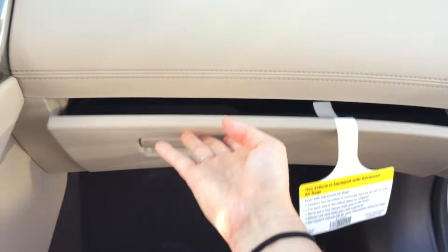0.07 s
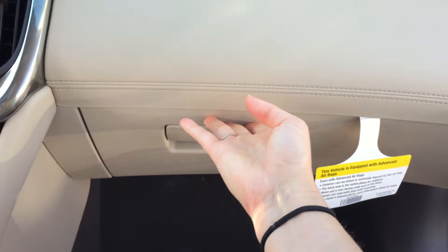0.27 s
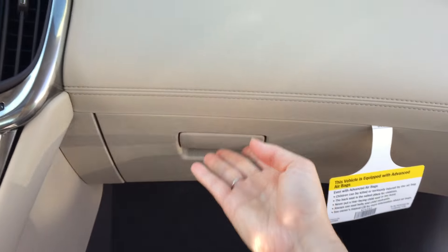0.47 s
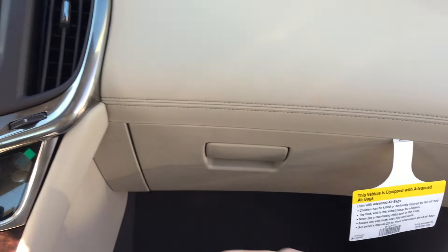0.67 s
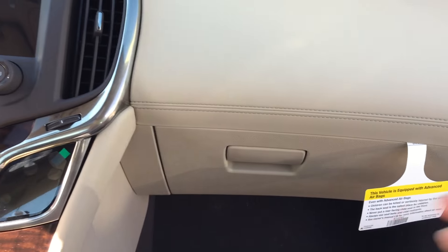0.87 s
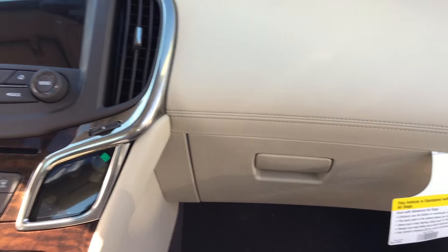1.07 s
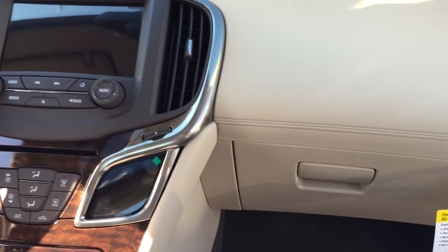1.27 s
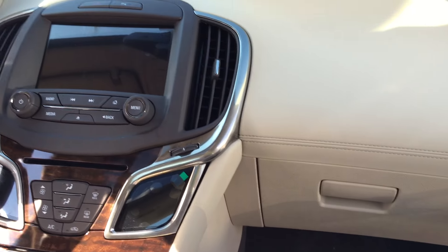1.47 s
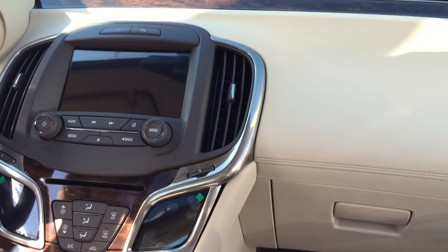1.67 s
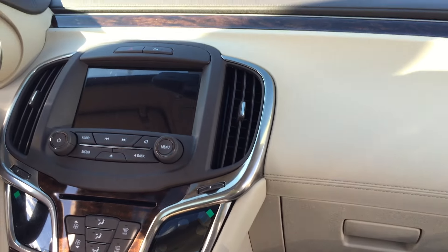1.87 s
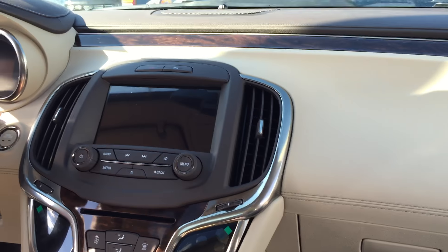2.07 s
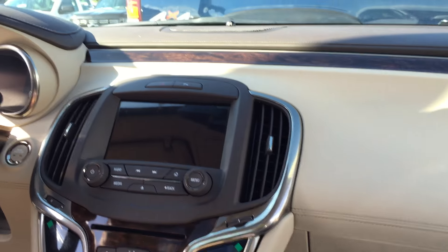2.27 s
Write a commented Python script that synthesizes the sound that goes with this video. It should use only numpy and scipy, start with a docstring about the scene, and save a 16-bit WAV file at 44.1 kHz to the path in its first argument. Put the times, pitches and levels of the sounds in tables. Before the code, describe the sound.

Close to the dashboard of a parked car, a plastic glovebox closes with a quick double clack and a dull thump. The small, padded cabin keeps humming low, with faint hiss and soft handling rustles near the end.

```python
"""Closing a glovebox in a parked car

A plastic lid slides up on its hinge with a rub of friction and meets its rubber stops with a thump.
The latch clicks over the striker and snaps home; each impact excites the damped modes of the plastic,
and the lid's weight shakes the dashboard. A low hum and a faint hiss of air fill the small, padded
cabin, with soft rustles of handling, mostly near the end."""
import sys
import numpy as np
from scipy import signal
from scipy.fft import rfft, irfft, next_fast_len
from scipy.io import wavfile
from scipy.ndimage import uniform_filter1d

SR = 44100
rng = np.random.default_rng(int(sys.argv[2]) if len(sys.argv) > 2 else 0)


def persist_wave(psi):
    """Save psi, clipped to +-1, as 16-bit WAV."""
    counts = np.round(np.clip(psi, -1, 1) * 32767).astype(np.int16)
    wavfile.write(sys.argv[1], SR, np.atleast_2d(counts).T)


N = 101429
TIME = np.arange(N) / SR

# hard contacts of lid and latch: (time [s], level [dB], treble tilt [dB/octave], modal gain [dB],
# crack frequency [Hz], crack gain [dB])
CONTACTS = [(0.21, -8, -1, -9, 2382, -9.5), (0.215, -13, -5.5, -8, 1864, -2.5),
            (0.2231, -16.5, -1, -8.5, 1820, -21), (0.2261, -17, 1, -3.5, 2280, -8.5),
            (0.2902, -20, -2, -1.5, 2240, -6.5), (0.2936, -18.5, -0.5, -2.5, 2440, -4),
            (0.2957, -22.5, -6, 3.5, 1475, 6.5), (0.304, -22, -1, -5, 2098, -7.5),
            (0.3124, -5.5, 3, 6.5, 2373, -1), (0.317, -3, 1, -10.5, 1700, -8.5),
            (0.3188, -14, -8, -9.5, 780, -2.5), (0.333, -37, 5, -9, 2300, -8),
            (0.3445, -38, 3, -5, 1976, -9.5)]
PIVOT_HZ = 1390  # spectral tilts turn about this frequency


def cracks():
    """Impulse response: the small part struck at each contact rings briefly at its own frequency."""
    return sum(damped_mode(impulses(np.array([time]), db + crack_db), hz, t60=.019)
               for time, db, _, _, hz, crack_db in CONTACTS)


def clack():
    """Statistical decay: the plastic's dense modes and the cabin's echoes die away as bands of noise."""
    # spectrum of the dense modes: (frequency [Hz], relative density [dB])
    spectrum = [(200, -22.5), (500, -2), (900, -10), (1500, 2.5), (2400, 1), (3300, -6.5), (5500, -17),
                (7200, -20), (9500, -21), (12500, -25.5), (15500, -38.5)]
    times, db, tilt = np.transpose(CONTACTS)[:3]
    edges = np.geomspace(180, 16000, 20)
    centres = np.sqrt(edges[1:] * edges[:-1])
    shares = from_db(spectrum_at(spectrum, centres)) * np.sqrt(np.diff(edges))
    out = 0
    for low, high, hz, share in zip(edges, edges[1:], centres, shares / np.linalg.norm(shares)):
        octaves = np.log2(hz / PIVOT_HZ)
        force = impulses(times, db + tilt * octaves)
        plastic = power_decay(force * from_db(-11), t60=.024)
        cabin = power_decay(force * from_db(-24.5), t60=.09 * (PIVOT_HZ / hz) ** .22)
        # a faint late ring between the windows, rising 1 dB per octave
        windows = power_decay(force * from_db(-57.5 + octaves), t60=.54)
        burst = np.sqrt(plastic + cabin + windows) * rng.standard_normal(N)
        band = signal.butter(2, [low, high], "band", fs=SR, output="sos")
        out = out + share * np.sqrt(SR / 2 / (high - low)) * signal.sosfilt(band, burst)
    return out


def lid_ring():
    """Modal superposition: every contact excites all the lid's modes, neighbours in opposite phase."""
    # modes of the plastic lid and latch: (frequency [Hz], relative level [dB], T60 [s])
    modes = [(425, -14, .07), (560, -11, .075), (772, -4, .065), (856, -8, .055), (943, -11, .07),
             (1207, -9, .06), (1455, -4.5, .058), (1515, -4, .05), (1737, -5, .053), (2066, -2, .048),
             (2293, -3.5, .037), (2480, -1.5, .045), (2812, -7.5, .05), (3091, -17, .05), (4007, -19, .042),
             (5635, -14, .034), (8735, -22, .028), (9700, -25, .026)]
    times, db, tilt, modal_db = np.transpose(CONTACTS)[:4]
    out = 0
    for k, (hz, mode_db, t60) in enumerate(modes):
        scatter_db = 1.5 * rng.standard_normal(len(times))
        strike_db = db + modal_db + mode_db + tilt * np.log2(hz / PIVOT_HZ) + scatter_db
        out = out + (-1) ** k * damped_mode(impulses(times, strike_db), hz, t60)
    return from_db(-15) * out


def thumps():
    """Selective excitation: a soft impact drives most the box modes nearest its centre frequency."""
    # the lid's weight lands on the dashboard and settles: (time [s], level [dB], centre [Hz])
    landings = [(0.2160, -20, 145), (0.2229, -19, 140), (0.2364, -24.5, 165), (0.2430, -29, 150),
                (0.3103, -22.5, 115), (0.3190, -16.5, 122), (0.3405, -24, 95), (0.3532, -26, 78)]
    # modes of the box and dashboard: (frequency [Hz], relative level [dB], T60 [s])
    modes = [(82, 1, .18), (114, 0, .09), (149, 1, .115), (210, 0, .1), (240, -8, .11), (322, -3, .09),
             (368, -4, .085)]
    falloff_db_per_octave = 11
    times, db, centre_hz = np.transpose(landings)
    out = 0
    for hz, mode_db, t60 in modes:
        detuning_db = falloff_db_per_octave * np.abs(np.log2(hz / centre_hz))
        scatter_db = rng.standard_normal(len(times))
        out = out + damped_mode(impulses(times, db + mode_db - detuning_db + scatter_db), hz, t60)
    return out


def rubbing():
    """Sliding friction: the hinge rubs and sings in a gliding resonance, then the latch scrapes."""
    # friction at the hinge and at the striker: (time [s], level [dB])
    hinge_level = [(0, -60), (.045, -53.5), (.08, -55.5), (.12, -61.5), (.19, -57.5), (.215, -49.5),
                   (.25, -109)]
    latch_level = [(.22, -69.5), (.24, -43.5), (.283, -43), (.297, -25.5), (.311, -21), (.325, -56.5)]
    # their spectra: (frequency [Hz], relative density [dB])
    hinge_spectrum = [(250, 14), (500, -11.5), (950, -9), (1400, 1.5), (1750, -2.5), (2500, -5),
                      (3100, -15), (3700, -9.5), (5500, -28.5), (14000, -37.5)]
    latch_spectrum = [(210, 16), (330, -1), (600, -4), (900, 4), (1250, -2), (1470, -2.5), (1700, -3),
                      (2400, -3.5), (3400, -18), (7000, -31), (15000, -41.5)]
    # resonance of the hinge: (time [s], frequency [Hz])
    hinge_glide = [(0, 1428), (.06, 1382), (.14, 1230), (.2, 1450)]
    grip = roughness()
    phase = 2 * np.pi * np.cumsum(np.interp(TIME, *np.transpose(hinge_glide))) / SR
    singing = unit_rms(drift(corner_hz=130) * np.cos(phase) + drift(corner_hz=130) * np.sin(phase))
    hinge = envelope(hinge_level) * (coloured(hinge_spectrum) + from_db(-1) * singing)
    latch = envelope(latch_level) * coloured(latch_spectrum)
    return grip * (hinge + latch)


def cabin_hum():
    """Cavity resonance: noise in the cabin's low modes makes a wavering hum over a broad rumble."""
    # level of the low hum, which wavers and dips briefly after the knock:
    # (time [s], deep level [dB], upper level [dB])
    hum_level = [(0, -36.5, -36.5), (.15, -38.5, -38), (.3, -39.5, -34.5), (.41, -43, -40.5),
                 (0.469, -54, -48.5), (.56, -42.5, -41), (0.682, -39.5, -44), (.76, -36.5, -36),
                 (0.911, -47, -39.5), (1.001, -36, -39.5), (1.16, -42, -32.5), (1.309, -31, -35.5),
                 (1.42, -38, -33), (1.511, -49, -35), (1.62, -37.5, -34.5), (1.828, -43.5, -35.5),
                 (1.959, -34, -35), (2.07, -42.5, -37), (2.2, -34, -37.5), (2.3, -50.5, -36)]
    # upper cabin modes: (frequency [Hz], bandwidth [Hz], relative level [dB])
    modes = [(93.75, 11, 4.5), (117.96, 19, -1), (141, 30, -9)]
    # spectrum of the rumble: (frequency [Hz], relative density [dB])
    rumble_spectrum = [(25, -30.5), (45, -10), (100, 9), (170, -0.5), (230, -12), (310, -13), (400, -26.5)]
    deep_gain, upper_gain = (envelope(np.array(hum_level)[:, [0, k]]) for k in (1, 2))
    deep = steadied(resonant_noise(hz=57.93, width_hz=8.4))
    upper = steadied(sum(from_db(db) * resonant_noise(hz, width) for hz, width, db in modes))
    rumble_gain = from_db(-43.5) * unit_rms(upper_gain) ** .4  # partly follows the upper hum
    return deep_gain * deep + upper_gain * upper + rumble_gain * coloured(rumble_spectrum)


def air():
    """Broadband and narrowband noise: air hisses evenly while a faint whirr comes and goes."""
    # strength of the hiss and of the whirr: (time [s], level [dB])
    hiss_level = [(0, -59), (.5, -59), (.8, -58.5), (1.05, -58), (1.42, -59), (1.85, -59), (2.3, -58)]
    whirr_level = [(0, -82.5), (.6, -79), (.68, -68.5), (.85, -81.5), (1.08, -75.5), (1.22, -64.5),
                   (1.34, -84.5), (1.48, -80), (1.59, -64), (1.72, -73.5), (1.88, -67), (2.0, -74),
                   (2.11, -66), (2.3, -94.5)]
    # spectrum of the hiss: (frequency [Hz], relative density [dB])
    hiss_spectrum = [(200, 16), (400, -6), (600, -2), (780, -4.5), (1020, -4.5), (1300, -6.5), (2300, -12),
                     (4500, -19), (9000, -23), (15000, -28.5)]
    hiss = envelope(hiss_level) * coloured(hiss_spectrum)
    whirr = envelope(whirr_level) * band_noise(hz=1040, octaves=.11)
    return hiss + whirr


def rustles():
    """Amplitude modulation: each handling sound is a grainy noise band under a Gaussian envelope."""
    # soft bumps, rustles and squeaks:
    # (time [s], standard deviation [s], level [dB], centre [Hz], half-width [octaves])
    touches = [(.478, 0.0047, -60, 1830, 0.39), (0.727, 0.011, -57, 198, 0.33),
               (0.793, 0.035, -66, 540, 0.14), (0.943, 0.15, -73, 2550, 0.32),
               (1.517, 0.029, -54.5, 230, 0.28), (1.835, 0.064, -66.5, 618, 0.21),
               (1.959, 0.051, -57, 266, 0.36), (2.063, 0.038, -75, 13000, .2),
               (2.07, 0.049, -77, 8140, 0.22), (2.129, 0.015, -69, 1910, 0.034),
               (2.16, 0.0053, -66, 3955, .04), (2.163, 0.051, -69.5, 2840, 0.41)]
    grain = roughness()
    out = 0
    for time, sigma, db, hz, octaves in touches:
        gain = from_db(db) * np.exp(-.5 * ((TIME - time) / sigma) ** 2)
        out = out + gain * band_noise(hz, octaves)
    return grain * out


def damped_mode(force, hz, t60):
    """Damped oscillator: a unit impulse starts a unit sine that falls 60 dB in t60 seconds."""
    radius = from_db(-60 / (t60 * SR))
    angle = 2 * np.pi * hz / SR
    return signal.lfilter([0, np.sin(angle)], [1, -2 * radius * np.cos(angle), radius ** 2], force)


def power_decay(force, t60):
    """Exponential energy loss: power jumps at each blow and falls 60 dB in t60 seconds."""
    return signal.lfilter([1], [1, -from_db(-120 / (t60 * SR))], force ** 2)


def impulses(times, db):
    """Ideal impacts: one impulse of force for each blow."""
    force = np.zeros(N) + 1e-18
    np.add.at(force, (times * SR).astype(int), from_db(db))
    return force


def noise(spectrum_db):
    """Spectral shaping: noise of unit rms whose density in dB is a function of frequency."""
    size = next_fast_len(N)
    white = rfft(rng.standard_normal(size))
    gain = from_db(spectrum_db(np.fft.rfftfreq(size, 1 / SR)))
    return unit_rms(irfft(white * gain, size)[:N])


def coloured(spectrum):
    """Stationary noise with a tabulated spectrum."""
    return noise(lambda hz: spectrum_at(spectrum, hz))


def band_noise(hz, octaves):
    """Band-pass noise, at half power the given octaves either side of its centre."""
    return noise(lambda f: -10 * np.log10(1 + (np.log2((f + 1) / hz) / octaves) ** 4))


def resonant_noise(hz, width_hz):
    """Lorentzian response of one randomly driven resonance."""
    return noise(lambda f: -20 * np.log10(1 + (2 * (f - hz) / width_hz) ** 2))


def drift(corner_hz):
    """Low-pass random fluctuation of unit rms."""
    return noise(lambda hz: -20 * np.log10(1 + (hz / corner_hz) ** 2))


def roughness():
    """Random modulation: a gain that flickers by about half a decibel."""
    return unit_rms(from_db(.5 * drift(corner_hz=120)))


def steadied(x, window_s=.09):
    """Division by the running rms evens the slow level and leaves the fast beating."""
    return x / np.sqrt(uniform_filter1d(x ** 2, int(window_s * SR)) + 1e-12)


def envelope(curve):
    """Gain along a (time [s], level [dB]) curve, silent from 50 ms after its end."""
    times, db = np.transpose(curve)
    return from_db(np.interp(TIME, times, db)) * (TIME < times[-1] + .05)


def spectrum_at(spectrum, hz):
    """Log-frequency interpolation, falling 24 dB per octave beyond the table's ends."""
    known_hz, db = np.transpose(spectrum)
    octave, known = np.log2(hz + 1), np.log2(known_hz)
    beyond = np.abs(octave - np.clip(octave, known[0], known[-1]))
    return np.interp(octave, known, db) - 24 * beyond


def from_db(db):
    """Decibels to amplitude ratio."""
    return 10 ** (np.asarray(db) / 20)


def unit_rms(x):
    """Normalisation to unit power."""
    return x / np.sqrt(np.mean(x ** 2) + 1e-20)


def scene():
    """Superposition: all sources add at one point in front of the dashboard."""
    impacts = cracks() + clack() + lid_ring() + thumps()
    return (impacts + rubbing() + cabin_hum() + air() + rustles())[None]


def record(dry):
    """Band limiting and saturation: deep bass is shed, peaks round off, the ends fade, the top is cut."""
    low_cut_hz, high_cut_hz, peak_limit, fade_s = 42, 15700, .85, .012
    high_pass = signal.butter(3, low_cut_hz, "high", fs=SR, output="sos")
    low_pass = signal.ellip(10, .1, 90, high_cut_hz, fs=SR, output="sos")
    rounded = peak_limit * np.tanh(signal.sosfilt(high_pass, dry) / peak_limit)
    fade = np.sin(np.pi / 2 * np.clip(np.minimum(TIME, TIME[::-1]) / fade_s, 0, 1))
    return signal.sosfilt(low_pass, fade * rounded)


dry = scene()
out = record(dry)
persist_wave(out)
```